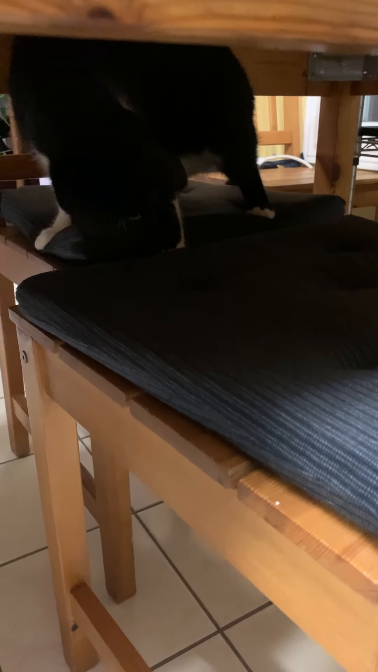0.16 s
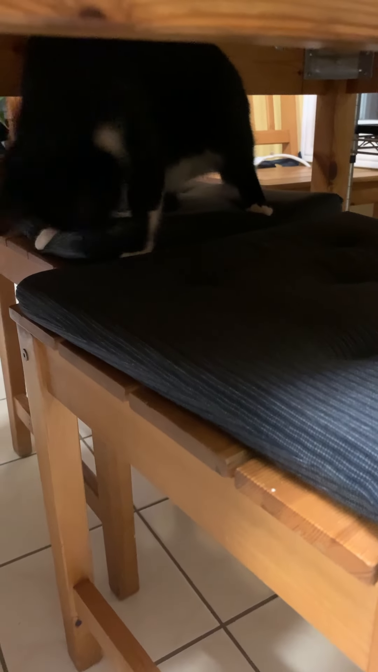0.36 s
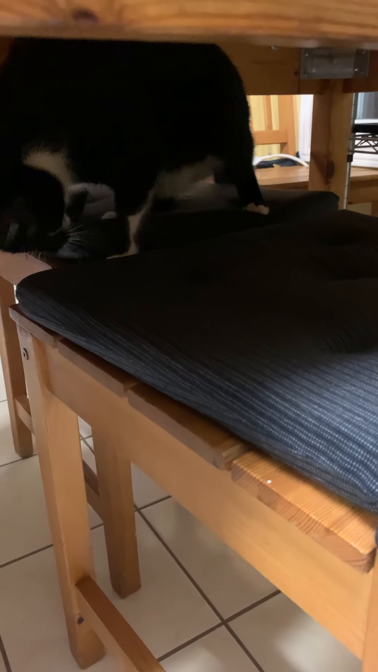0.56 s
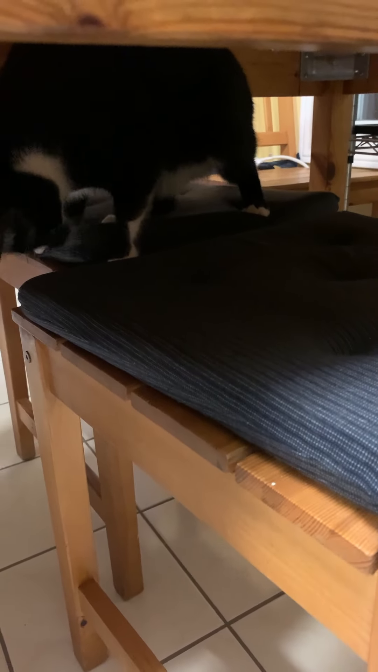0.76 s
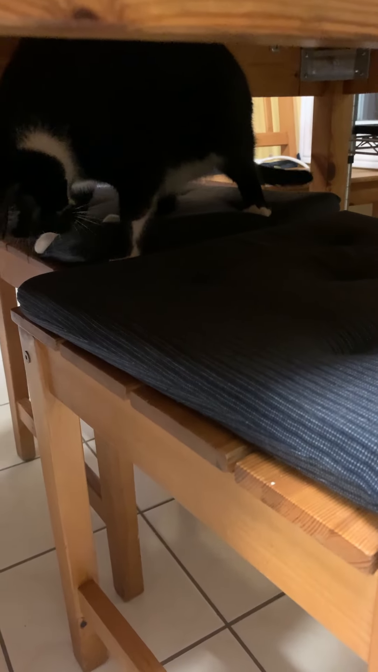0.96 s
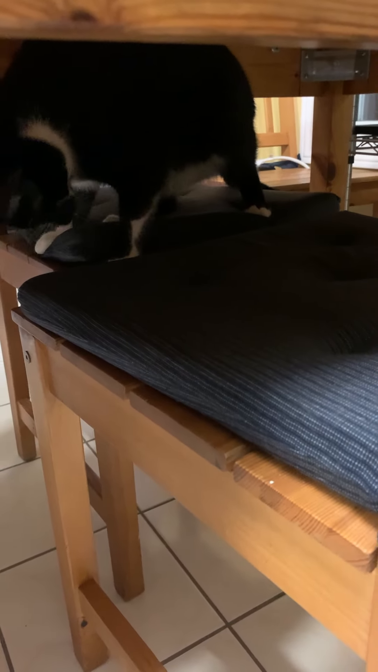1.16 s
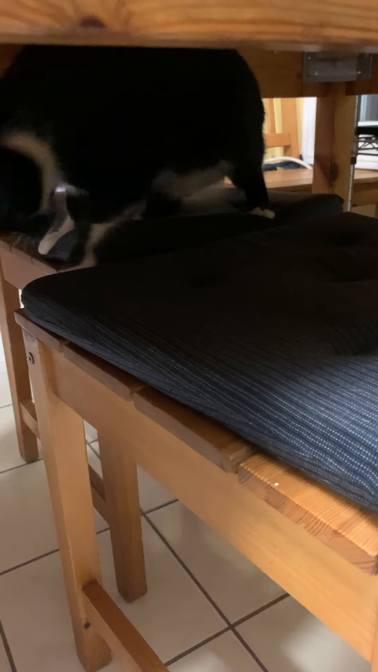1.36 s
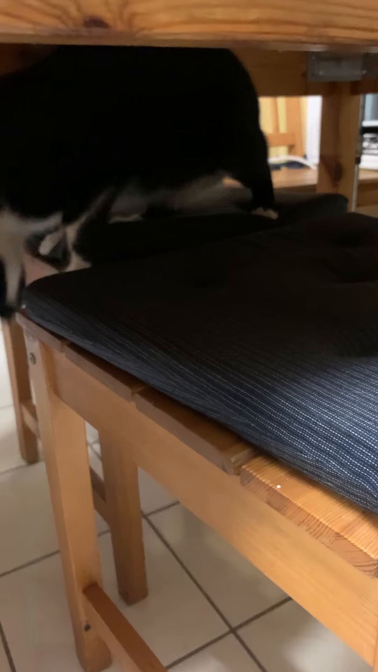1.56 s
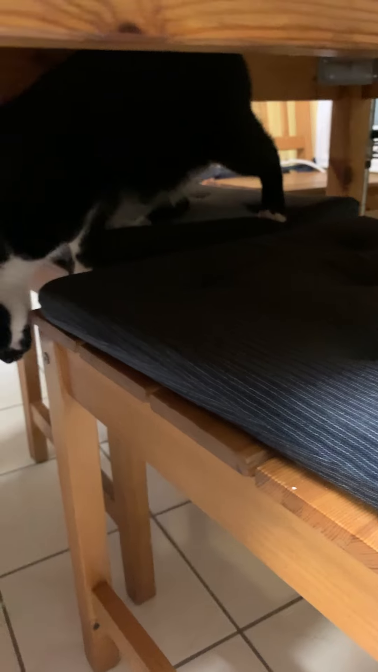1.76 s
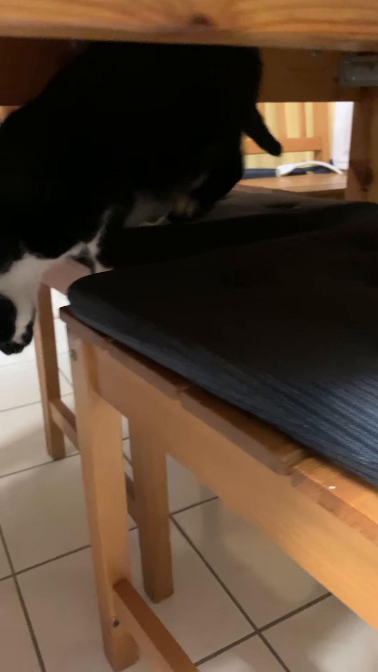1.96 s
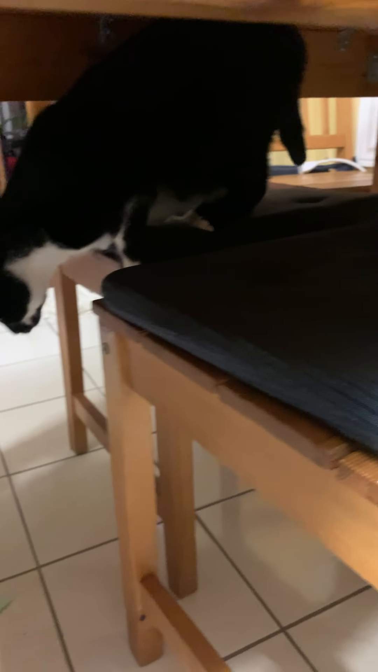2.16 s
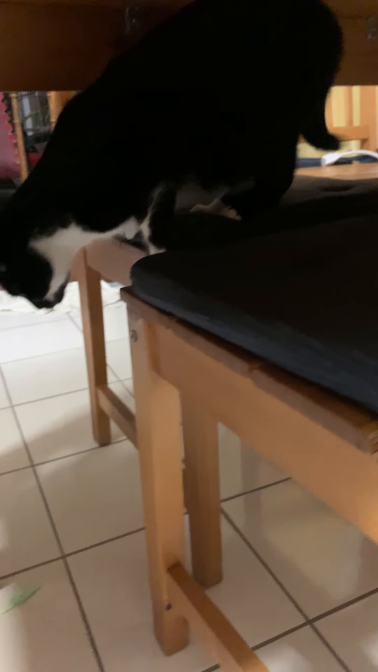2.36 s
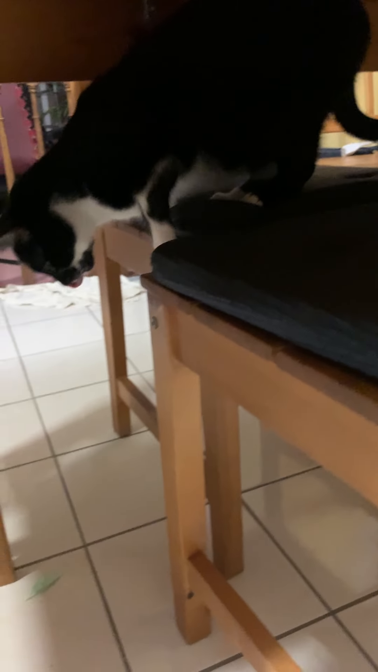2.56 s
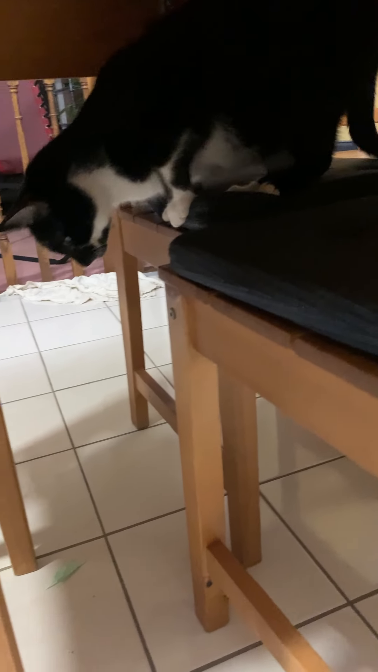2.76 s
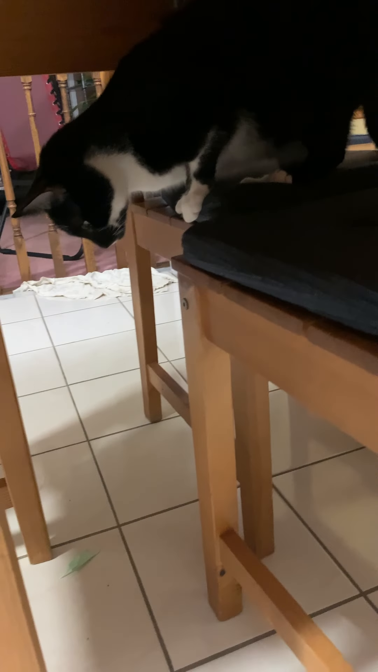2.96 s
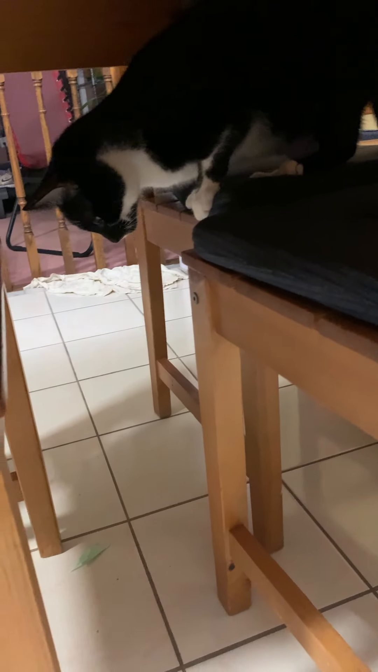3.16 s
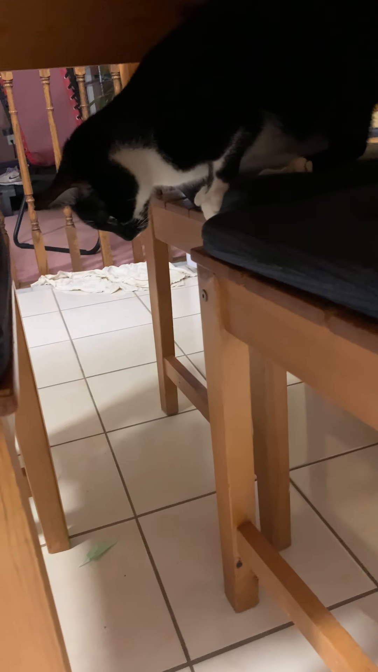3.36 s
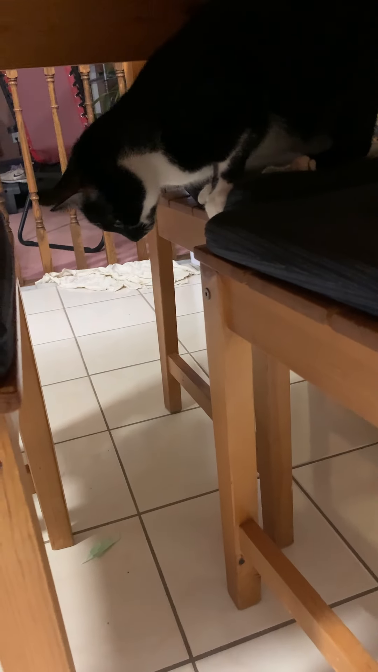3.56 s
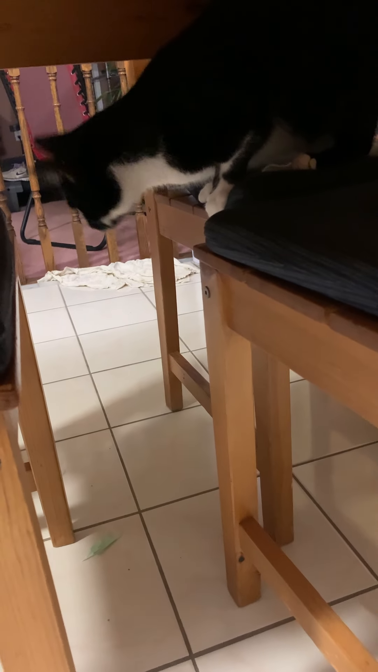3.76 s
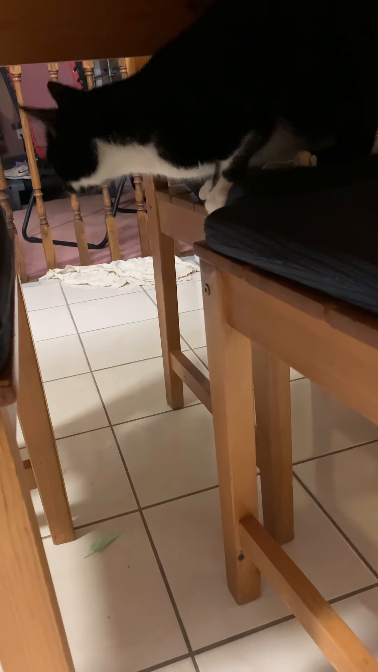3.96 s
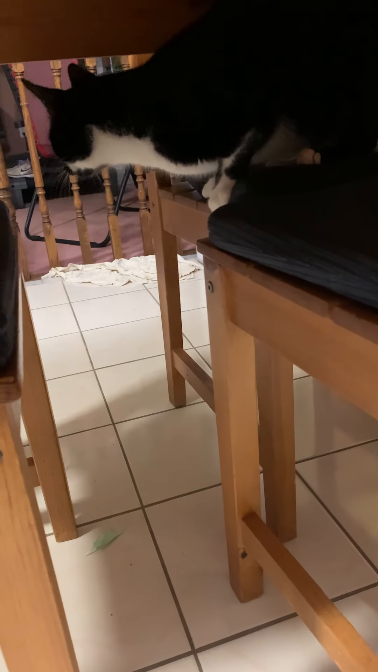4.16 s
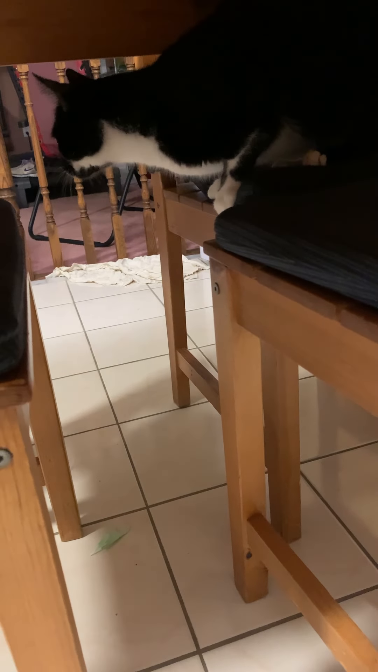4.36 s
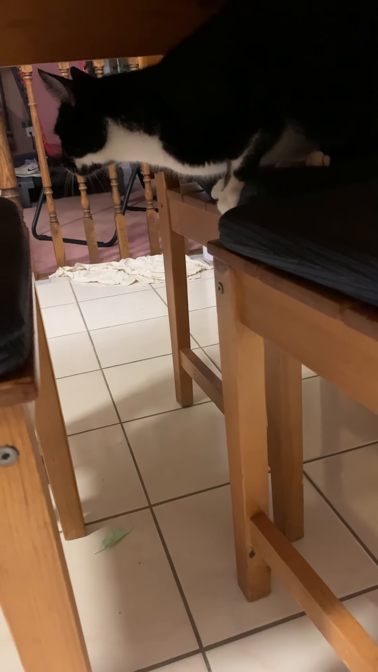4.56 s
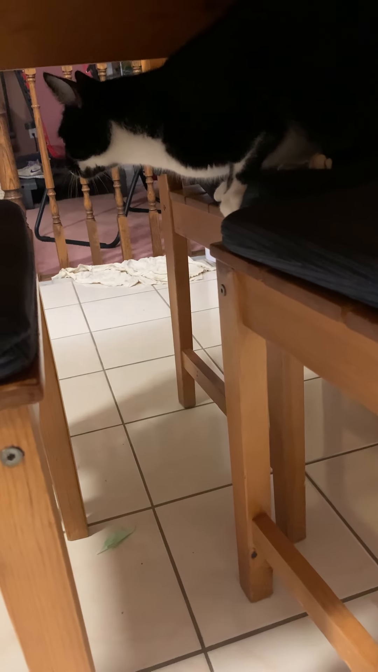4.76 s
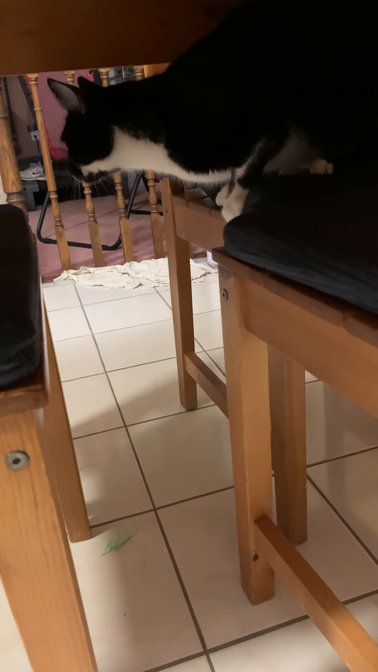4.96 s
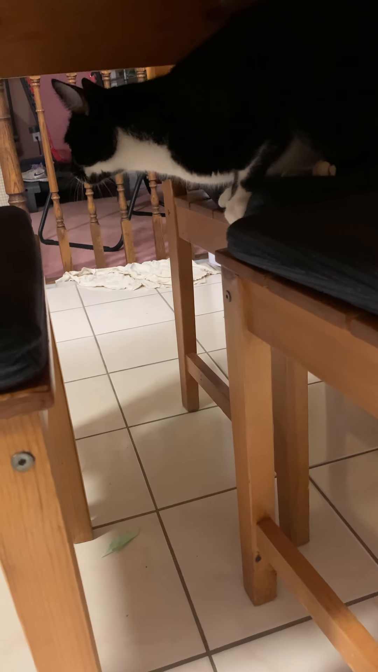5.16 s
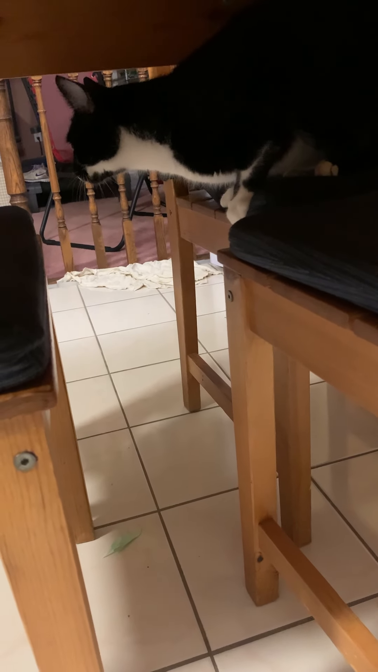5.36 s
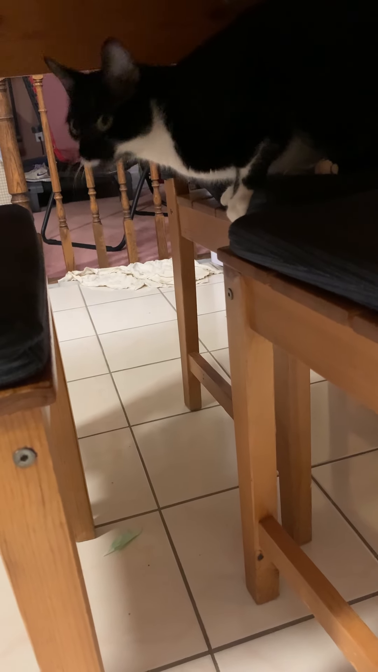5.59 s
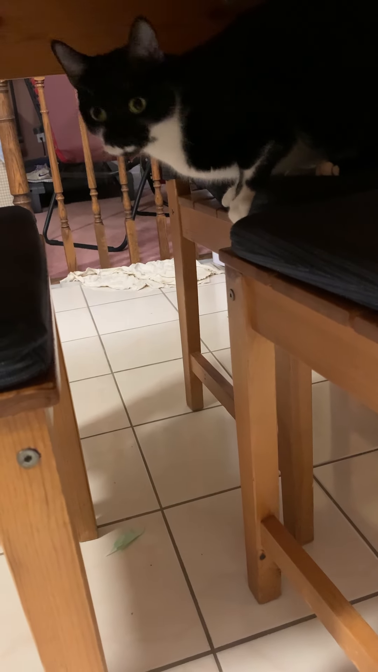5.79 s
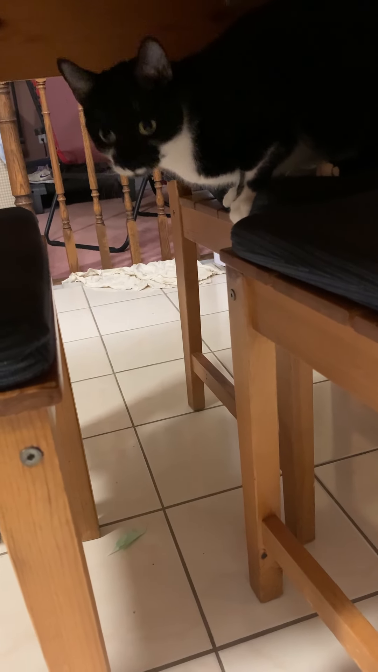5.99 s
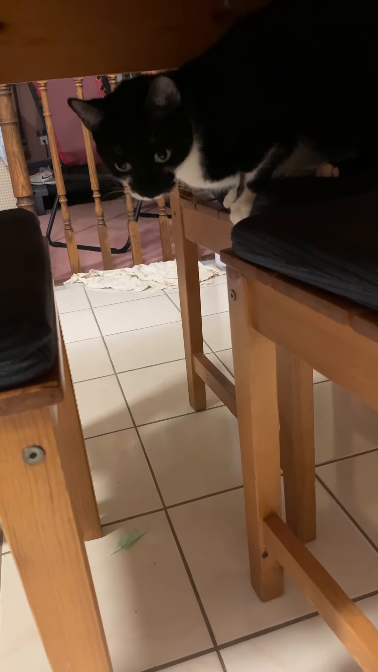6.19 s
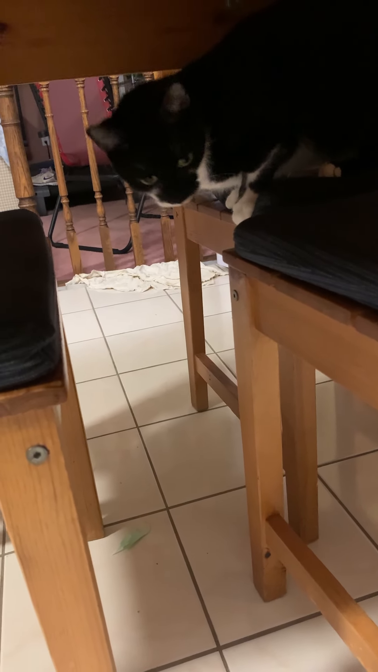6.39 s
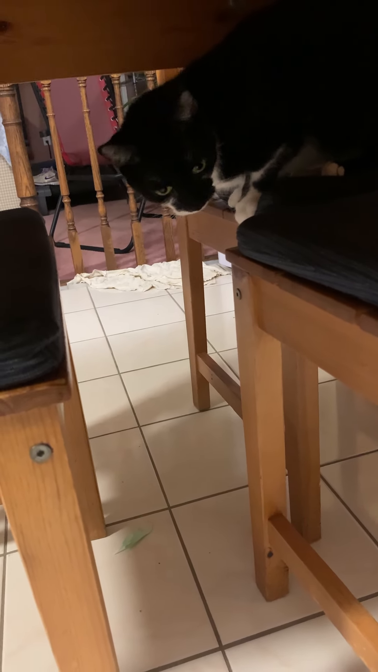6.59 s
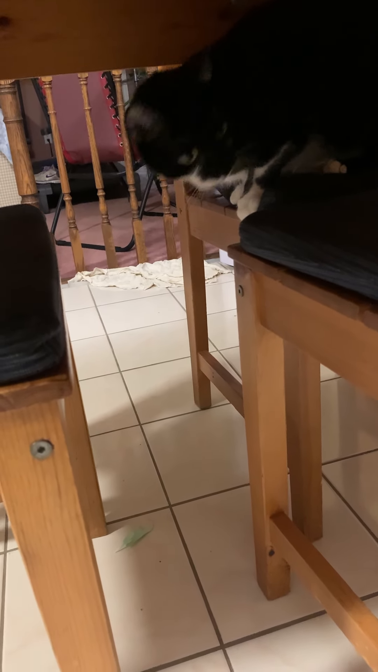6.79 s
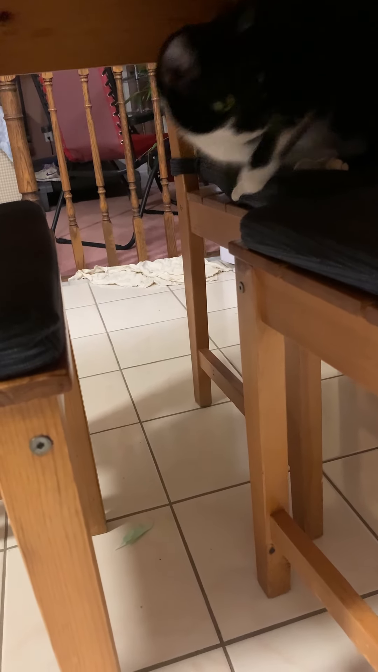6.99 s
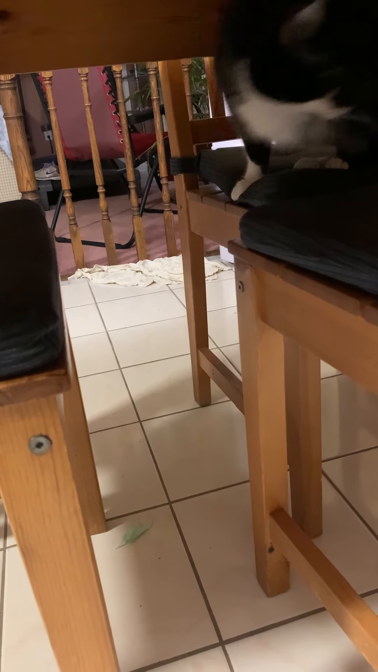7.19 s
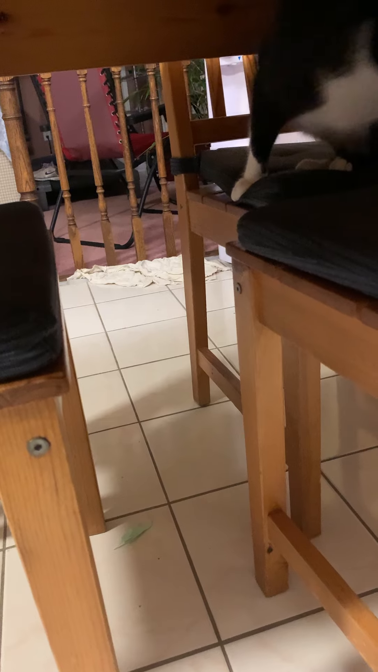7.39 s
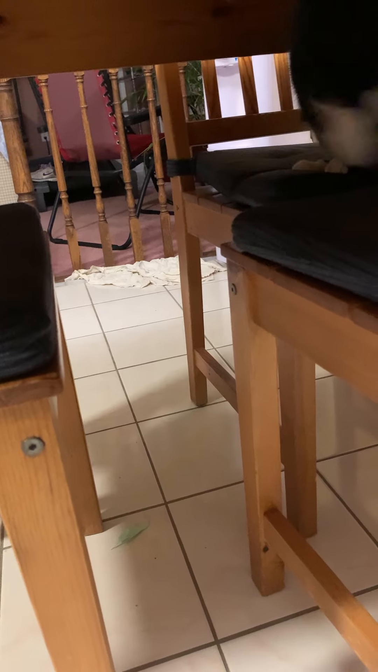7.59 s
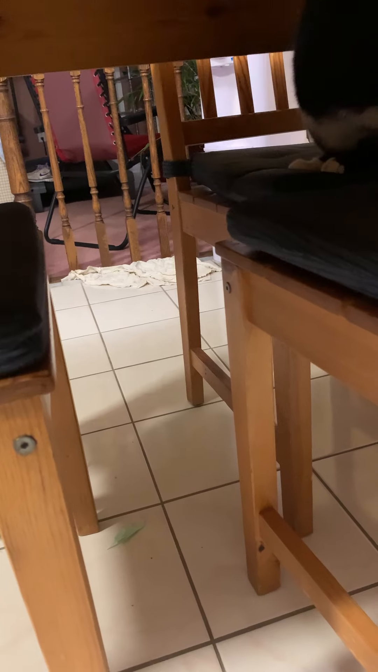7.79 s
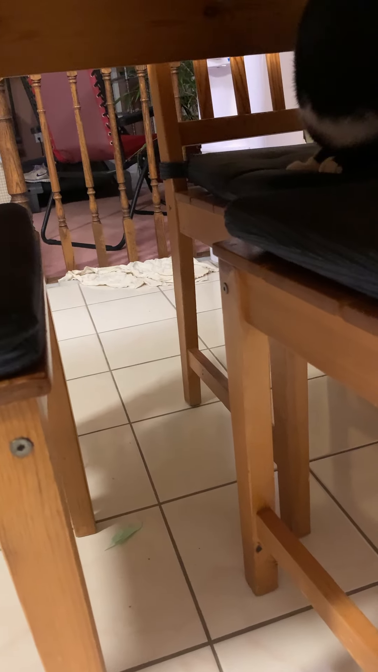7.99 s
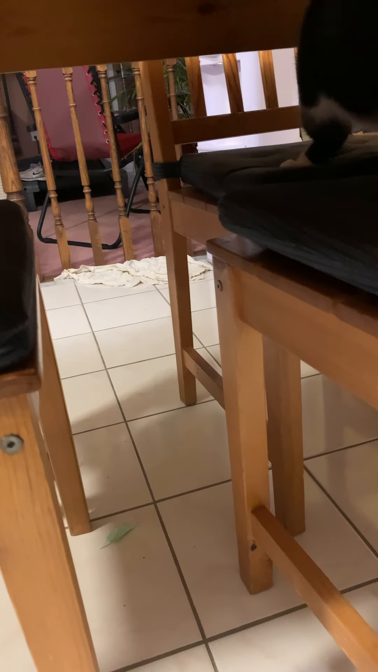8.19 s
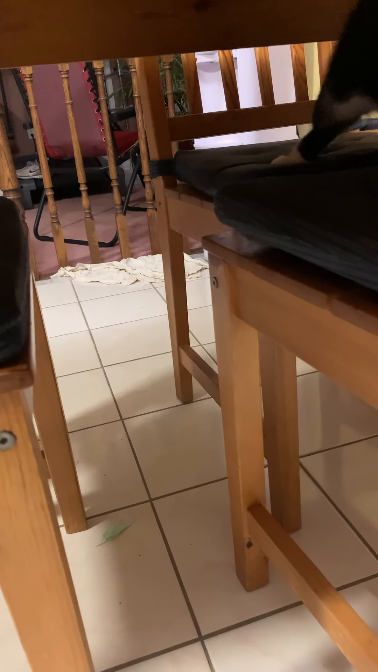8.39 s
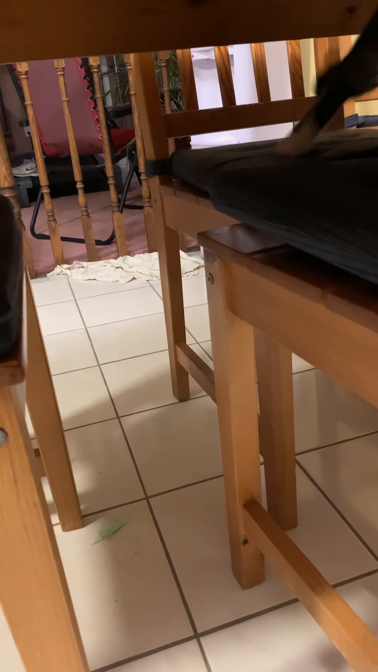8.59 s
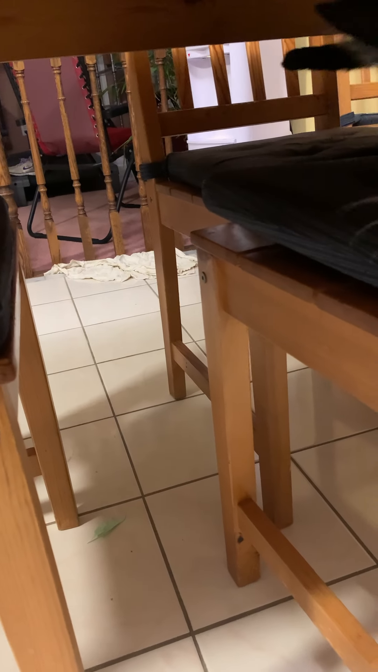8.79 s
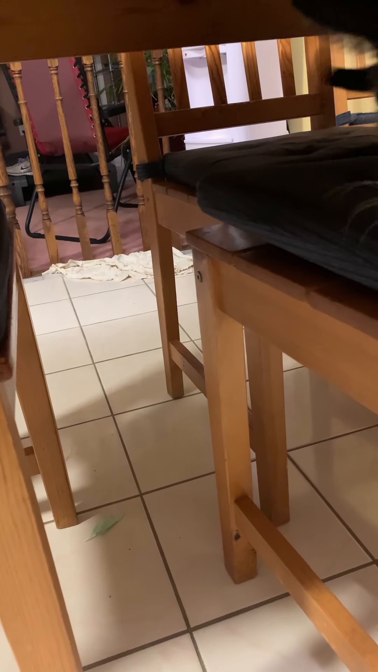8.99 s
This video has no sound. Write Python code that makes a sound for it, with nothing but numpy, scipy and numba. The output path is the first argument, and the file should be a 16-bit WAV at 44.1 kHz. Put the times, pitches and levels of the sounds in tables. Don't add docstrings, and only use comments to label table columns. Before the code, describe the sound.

A cat shifts on cushioned wooden chairs in a tiled kitchen. Hollow leg knocks, claw snags, rustling fabric and short seat squeaks fill the first moments, then a toothpick skips brightly over the tiles. About five seconds of refrigerator hum follow before the chair rocks again in uneven knocks. A close handheld phone hears it in stereo.

```python
import sys
import numpy as np
from scipy import signal
from scipy.fft import rfft, irfft, next_fast_len
from scipy.io import wavfile
from numba import njit

SR = 44100
rng = np.random.default_rng(int(sys.argv[2]) if len(sys.argv) > 2 else 0)


def ratio_of_db(decibels):
    return 10 ** (np.asarray(decibels, float) / 20)


def to_wav(s):
    ch = np.atleast_2d(s).T
    pcm = np.round(np.clip(ch, -1, 1) * 32767)
    wavfile.write(sys.argv[1], SR, pcm.astype(np.int16))


N = 398643
TIME = np.arange(N) / SR


def on_log(hz, table):
    points = np.array(table)
    return np.interp(np.log(np.maximum(hz, 1)), np.log(points[:, 0]), points[:, 1])


def tinted(x, gain):
    size = next_fast_len(x.shape[-1])
    hz = np.arange(size // 2 + 1) * SR / size
    return irfft(rfft(x, size) * gain(hz), size)[..., :x.shape[-1]]


def band(x, hz, width):
    y = tinted(x, lambda f: np.exp(-.5 * ((f - hz) / width) ** 2))
    return y / y.std()


def walk(rate, when=TIME):
    steps = rng.standard_normal(400)
    return np.interp(when * rate, np.arange(len(steps)), steps) * 1.276


def fall(t, t60):
    return np.exp(-np.log(1000) * t / t60)


def stroke(s, rise_s, t60):
    late = TIME - s
    return np.exp(np.where(late < 0, -2 * (late / rise_s) ** 2, -np.log(1000) * late / t60))


def add(out, s, sound):
    start = int(max(s, 0) * SR)
    out[:, start:start + sound.shape[1]] += sound[:, :N - start]


def bending_crack(t, blow_hz, crack_db):
    # delay/ms, level/dB
    reflections = [
        (10.6, -7.5),
        (18.5, -24.5),
        (25, -14.5),
    ]
    peak_s = .0098
    octave = np.log2(blow_hz / 200)
    late = (t - peak_s) * blow_hz
    turns = np.cumsum(.88 * blow_hz + 1900 * np.exp(-t / .0031)) / SR
    rise = (t / peak_s) ** (2.2 * (blow_hz / 200) ** 0.79)
    swell = np.where(t < peak_s, rise, np.exp(-(late / 1.3) ** 2))
    sweep = np.cos(2 * np.pi * (turns - turns[int(peak_s * SR)]))
    slap_db, slap_db_per_octave, slap_cycles = -5, 11, 0.12
    spike = (late / slap_cycles) ** 2
    slap = ratio_of_db(crack_db + slap_db + slap_db_per_octave * octave) * (1 - spike) * np.exp(-spike / 2)
    crack = ratio_of_db(crack_db - 8.5) * sweep * swell + slap
    returns = list(reflections)
    if blow_hz > 235:
        returns += [(7.0, -4), (11.0, -6)]
    crack = crack + sum(ratio_of_db(db) * np.roll(crack, int(ms * SR / 1000)) for ms, db in returns)
    return np.array([crack, 0.055 * crack])


def patter(t, tint):
    # f/Hz, level/dB, centre/ms
    packets = [(450, -19.5, 7.8), (810, -15, 6.8), (1580, -30.5, 6.5), (2480, -54, 8)]
    out = np.zeros((2, len(t)))
    for hz, db, ms in packets:
        pulse = (1000 * t / ms * np.exp(1 - 1000 * t / ms)) ** 4
        noise = band(rng.standard_normal(len(t)), hz, 0.272 * hz)
        out += ratio_of_db(db) * tint(hz) * noise * pulse * [[1], [.3]]
    return out


def frame_ring(t, tint, ring, onset):
    # f/Hz, level/dB, t60/s
    modes = [(164.5, 9, 0.11), (233.2, 0, 0.18), (273, -10.5, 0.059), (366.6, -13.5, 0.6), (420.2, 3, 0.24),
             (497, -1.5, 0.19), (556.3, 4, 0.099), (716, -6.5, 0.11), (812, -3, 0.22), (917, -6, 0.18),
             (1240, -17.5, 0.15), (1330, -28, 0.035), (1596, -11.5, 0.11), (2860, -28.5, 0.071)]
    out = np.zeros((2, len(t)))
    for hz, db, t60 in modes:
        luck = rng.standard_normal((2, 3))
        phase = 2 * np.pi * hz * (1 + 0.016 * luck[:, :1]) * t + 3 * luck[:, 1:2]
        wave = np.sin(phase) * ratio_of_db(1.87 * luck[:, 2:])
        out += ratio_of_db(db - 14.0) * tint(hz) * wave * fall(t, t60 * ring) * (1 - np.exp(-onset))
    return out


def knock_tail(t, tint, ring, onset):
    # f/Hz, level/dB, t60/s
    bands = [(127, -13.5, 0.93), (246, -0.5, 0.52), (525, -2, 0.43), (985, -7, 0.38), (1654, -25.5, 0.39),
             (2600, -30.5, 0.56), (4800, -41.5, 0.84), (6600, -42.5, 0.14)]
    early = ratio_of_db(3.0) * fall(t, 0.081)
    out = np.zeros((2, len(t)))
    for hz, db, t60 in bands:
        wave = band(rng.standard_normal((2, len(t))), hz, 0.39 * hz)
        rise = 1 - np.exp(-(t * hz / 10) ** 3 - onset)
        out += ratio_of_db(db - 19.5) * tint(hz) * wave * (fall(t, t60 * ring) + early) * rise
    return out


def knocks():
    # t/s, peak level/dB, brightness/dB, pitch of the blow f/Hz, crack over ring level/dB
    blows = [(0.014, -38, -15.5, 204, -0.5), (0.192, -22, -31, 175, 5.5), (0.356, -28.5, -37, 188, 5),
             (0.881, -47, -48, 180, 11), (0.989, -23, -25.5, 180, 4), (1.2241, -40.5, -40, 168, 8),
             (1.331, -40, -23.5, 196, 4.5), (1.6558, -20.5, -20, 245, 6.5), (1.757, -36, -48, 243, 6),
             (7.235, -42, -24.5, 154, 11), (7.3938, -23, -24, 217, 3.5), (7.553, -52, -35, 225, 6.5),
             (7.967, -53.5, -12, 176, 7.5), (8.0667, -30, -30, 325, 2), (8.072, -26, -35.5, 326, -2.5),
             (8.135, -22.5, -19.5, 286, 3.5), (8.214, -38.5, -30, 292, 8), (8.57, -44.5, -51, 237.8, 4.5),
             (8.684, -51, -39, 252, 1), (8.755, -27.5, -46.5, 267, -0.5), (8.855, -30.5, -40, 285, -1.5),
             (8.913, -53, -36, 260, 9), (8.95, -33.5, -44, 200, 2), (9.003, -54, -38, 238, 6)]
    out, t = np.zeros((2, N)), np.arange(24576) / SR
    onset = (t / 0.021) ** 3
    for s, db, bright_db, blow_hz, crack_db in blows:
        bright = bright_db + 29.5
        ring = 0.94 + 0.0195 * bright + 0.12 * np.log2(blow_hz / 200)

        def tint(hz):
            near_db = 7.5 * np.exp(-(np.log2(hz / blow_hz) / 0.78) ** 2)
            return ratio_of_db(near_db + np.interp(np.log2(hz), [9.2, 10.5], [0, bright]))
        sound = bending_crack(t, blow_hz, crack_db) + patter(t, tint)
        sound = sound + frame_ring(t, tint, ring, onset) + knock_tail(t, tint, ring, onset)
        add(out, s - .005, ratio_of_db(db) * sound * [[1], [0.65]])
    return out


def floor_boom():
    # t/s of the peak, level/dB, t60/s
    shifts = [(0.005, -56.5, 0.58), (0.205, -48, 2.08), (0.5, -57.5, 0.62), (1.011, -53, 0.36),
              (1.11, -55.5, 1.67), (1.42, -58, 0.6), (1.69, -47.5, 0.95), (7.277, -52.5, 0.76),
              (7.418, -47, 0.22), (7.512, -57, 0.31), (7.712, -59, 0.18), (7.92, -65, 0.16),
              (8.162, -43.5, 0.78), (8.552, -54, 6.5), (8.873, -49.5, 0.13), (9.03, -55, 0.34)]
    mode = band(rng.standard_normal((2, N)), 83.0, 18.4)
    return mode * sum(ratio_of_db(db) * stroke(s, 0.042, t60) for s, db, t60 in shifts)


def brittle_contacts(events):
    # delay/ms, level/dB
    near_echoes = [(1.9, -5), (3.8, 4.5), (5.5, -16), (8.0, -6), (12.2, -13)]
    snap_db, grit_db, contact_s, echo_db = 7, -5, 0.00054, -7
    out, lead = np.zeros((2, N)), .005
    t = np.arange(16384) / SR - lead
    begun = t >= 0
    snap = ratio_of_db(snap_db) * (np.arange(len(t)) == int(lead * SR))
    for s, db, low_db, top_db, room_db in events:
        noise = rng.standard_normal((2, len(t)))
        burst = snap + ratio_of_db(grit_db) * noise * np.exp(-abs(t) / (contact_s / 2)) * begun
        echoes = sum(ratio_of_db(level) * np.roll(burst, int(ms * SR / 1000), axis=1) for ms, level in near_echoes)
        tail = noise[::-1] * (ratio_of_db(-14.5) * fall(t, 0.082) + ratio_of_db(-23.5) * fall(t, 0.28)) * begun
        room = echoes * [[1], [-.6]] + tail * [[1], [ratio_of_db(3.5)]]
        sound = burst * [[1], [0.26]] + ratio_of_db(echo_db + room_db) * room
        colour = [(700, low_db - 7), (1500, low_db), (4200, low_db + 7.0), (4700, -6.5), (5200, -0.5),
                  (6800, -1.5), (8000, -4.0), (9000, -1.5), (10000, -5.0), (12000, -4.5),
                  (13500, top_db), (15500, top_db + 1.5)]
        sound = tinted(sound, lambda hz: ratio_of_db(on_log(hz, colour)))
        add(out, s - lead + 0.0012, ratio_of_db(db + 8.5) * sound)
    return out


def toothpick():
    # t/s, peak level/dB, low part level/dB, top part level/dB, room level/dB
    skips = [(1.573, -33.5, -19.5, -14, -3), (1.5989, -24.5, -17.5, 2.5, -2), (1.7355, -33.5, -7, -6, -6),
             (1.7738, -49, -1, -8, -4), (1.7944, -46.5, -11.5, -4, 1), (1.8198, -43.5, -12, 2, 0),
             (1.8374, -42, -9, -3, 0), (1.8446, -33.5, -19, -3, -1), (1.8806, -40.5, -5, -13, -4),
             (1.8927, -49.5, -7, -9, 4), (1.915, -42.5, -13, -0.5, -9), (1.9675, -46, -25, 4, -10),
             (1.981, -59, -15, -6, -9)]
    return brittle_contacts(skips)


def claws():
    # t/s, peak level/dB, low part level/dB
    catches = [(0.0135, -46.5, -26), (0.1165, -75, 4), (0.1216, -68, 3), (0.1652, -56.5, 11.5),
               (0.3022, -64, 15), (0.862, -58, -8), (1.245, -60, -5.5), (1.259, -56.5, -11.5),
               (1.271, -68, -12), (1.2943, -40, -4.5), (1.2981, -41.5, 3.5), (1.3026, -51.5, 8),
               (1.364, -64.5, 9), (1.384, -68.5, 12), (7.397, -61.5, 4), (7.408, -60.5, 10.5),
               (8.1354, -64.5, 10), (8.185, -70, 12.5), (8.6145, -62, 5)]
    top_db, room_db = -23, -0.5
    return brittle_contacts([(*catch, top_db, room_db) for catch in catches])


def rustles():
    # t/s of the peak, level/dB, rise/s, fall t60/s, pressure level/dB
    strokes = [(0.022, -54, 0.025, 0.068, 7.5), (0.126, -70.5, 0.014, 0.28, 9.5),
               (0.167, -54, 0.005, 0.1, 3), (0.205, -67, 0.022, 0.22, 2.5), (0.07, -74, 0.03, 0.16, 3.5),
               (0.26, -64, 0.024, 0.28, 6), (0.3, -63, 0.027, 0.16, -4.5), (0.335, -70, 0.014, 0.19, 2),
               (0.41, -79, 0.017, 0.32, 6), (0.372, -65.5, 0.026, 0.12, -10),
               (0.862, -66, 0.0063, 0.38, -2), (1.246, -54, 0.0083, 0.12, -3.5),
               (1.259, -51.5, 0.0027, 0.096, -4.5), (1.297, -52, 0.003, 0.045, 2),
               (1.345, -72, 0.013, 0.11, 3), (1.368, -76, 0.006, 0.077, 13),
               (1.273, -55.5, 0.0049, 0.12, -4), (1.31, -71, 0.012, 0.28, -1.5),
               (1.385, -94, 0.02, 0.15, -1), (7.406, -57.5, 0.013, 0.087, -5),
               (8.138, -64, 0.006, 0.086, 3), (8.33, -74.5, 0.035, 0.27, -12),
               (8.617, -71, 0.005, 0.12, 7.5)]
    # f/Hz, level/dB per Hz
    cloth = [(4700, -1), (5300, -2.5), (6300, 1), (7500, -8), (9000, -16.5), (12000, -29), (16000, -35)]
    bursts = rng.exponential(size=N // 64 + 1).repeat(64)[:N]
    grains = rng.standard_normal((2, N)) * ratio_of_db(2.9 * walk(39) + 0.77 * bursts)
    fine = tinted(grains, lambda hz: ratio_of_db(on_log(hz, cloth)) * (hz > 4300))
    out = fine / fine.std() * sum(ratio_of_db(db) * stroke(s, rise_s, t60) for s, db, rise_s, t60, _ in strokes)
    coarse, rub = band(grains, 1900, 1660), band(grains, 882, 190)
    for layer, layer_db, share in (coarse, -2, 1), (rub, -7.5, 2.08):
        out += layer * sum(ratio_of_db(db + layer_db + share * press_db) * stroke(s, rise_s, 1.73 * t60)
                           for s, db, rise_s, t60, press_db in strokes)
    return out


def squeaks():
    # t/s of the peak, level/dB, rise/s, fall t60/s
    presses = [
        (0.012, -57, 0.017, 0.2),
        (0.121, -55, 0.0079, 0.18),
        (0.32, -56, 0.022, 0.13),
        (0.39, -61.5, 0.017, 0.3),
        (0.845, -69.5, 0.088, 0.6),
        (0.864, -70, 0.0067, 1),
        (1.246, -56, 0.011, 0.5),
        (1.275, -52, 0.014, 0.11),
        (1.302, -57, 0.008, 0.036),
        (1.365, -67.5, 0.02, 0.14),
    ]
    squeak_hz, waver_hz, tone_db, noise_db = 1675, 22, -6, -3.5
    phase = 2 * np.pi * np.cumsum(squeak_hz + waver_hz * walk(30)) / SR
    tone = np.sqrt(2) * np.sin(phase) * ratio_of_db(1.5 * walk(38.9))
    noise = band(rng.standard_normal((2, N)), squeak_hz, 130)
    squeak = ratio_of_db(tone_db) * tone * [[1], [.4]] + ratio_of_db(noise_db) * noise
    return squeak * sum(ratio_of_db(db) * stroke(s, rise_s, t60) for s, db, rise_s, t60 in presses)


@njit
def tones(hz, gain, step):
    out = np.zeros((2, (gain.shape[2] - 1) * step))
    for k in range(len(hz)):
        z, p = 1 + 0j, np.exp(2j * np.pi * hz[k] / SR)
        for i in range(out.shape[1]):
            b, u = i // step, i % step / step
            z *= p
            for c in range(2):
                out[c, i] += (z * (gain[c, k, b] + u * (gain[c, k, b + 1] - gain[c, k, b]))).imag
    return out


def compressor():
    strong = {1: -70.5, 2: -65, 3: -52.5, 4: -65.5, 5: -71.5, 6: -68, 10: -72, 11: -59.5, 36: -84, 38:
              -80.5, 39: -79, 40: -80.5, 41: -79.5, 44: -85.5, 46: -84.5, 64: -85.5, 65: -84.5, 66: -81, 67:
              -82, 68: -82.5, 69: -68.5, 70: -77.5, 71: -78.5, 73: -87.5, 74: -80, 75: -76.5, 80: -103.5,
              82: -80.5, 105: -80.5, 106: -81.5, 107: -83, 108: -89, 126: -99}
    # f/Hz, level/dB rms
    casing = [(400, -86.5), (1200, -89.5), (2400, -99.5), (2950, -106), (3600, -99), (4500, -103),
              (5400, -87.5), (6300, -102), (6700, -110), (11000, -116)]
    # t/s, clear path level/dB, turn (-1..1)
    reach = [(0, -0.5, 0.34), (1, 1, -0.31), (1.5, -0.5, -0.0093), (2, 2.5, -0.21), (2.5, -0.5, -0.044),
             (2.9, -1.5, 0.6), (3.5, -2, 0.079), (4, 1, -0.33), (4.7, -1, 0.49), (5.5, -2, 1),
             (6, 1.5, 0.92), (6.5, -0.5, 0.51), (7, -2.5, 0.011), (7.5, 0.5, 0.5), (8, 1.4, -0.58),
             (8.5, 1.5, -0.98), (9.04, 4, -0.95)]
    # offset level/dB, share of the path, level/dB per turn
    buzz = [
        (0, 0.6, 1.3),
        (-1.3, 1.2, 0.5),
        (-2, 1.37, 7.5),
    ]
    move_db = {39: -1.5, 41: 2.5, 44: -1, 64: -6, 65: -2, 66: 10, 69: -4, 70: 3, 74: 4.5, 75: 5.5, 107: 1.5,
               108: 3.5}
    shaft_hz, move_s, move_span_s, step = 58.64, 2.62, 0.15, 512
    s, path_db, turn = np.transpose(reach)
    groups = [offset_db + share * path_db + turn_db * turn for offset_db, share, turn_db in buzz]
    blocks = np.arange(N // step + 2) * step / SR
    multiples = np.r_[1:128, 192:195]
    drift = 2 * np.pi * np.cumsum(0.0124 * walk(0.702, blocks)) * step / SR
    moved = np.tanh((blocks - move_s) / move_span_s) / 2
    gains = []
    for k in multiples:
        luck, hz = rng.standard_normal(3), k * shaft_hz
        db = strong.get(k, on_log(hz, casing) + 4 * luck[0])
        reach_db = 0 if hz < 1500 else np.interp(blocks, s, groups[int(hz > 3200) + int(hz > 5000)])
        reach_db = reach_db + move_db.get(k, 0) * moved
        unrest = min(hz / 2000, 1)
        sway_db = unrest * (2.8 * walk(1.1, blocks) + 1.5 * walk(7, blocks) + .9 * walk(40, blocks))
        sway_db = sway_db + .8 * walk(2.5, blocks)
        phase = k * drift + 1.5 * luck[1] + unrest * (.75 * walk(4, blocks) + .28 * walk(30, blocks))
        spread = np.array([[1], [np.exp(1.6j + .5j * luck[2])]])
        gains.append(ratio_of_db(db + reach_db + sway_db) * np.exp(1j * phase) * spread)
    return tones(multiples * shaft_hz, np.stack(gains, axis=1), step)[:, :N]


def fan():
    # f/Hz, level/dB rms
    hums = [(76, -68.5), (227, -64.5), (269, -81), (331, -74)]
    return sum(ratio_of_db(db) * band(rng.standard_normal((2, N)), hz, 4.3) for hz, db in hums)


def air():
    # f/Hz, level/dB per Hz
    density = [(25, -104), (45, -97), (80, -90), (200, -87), (350, -90), (600, -97.5), (1000, -103),
               (2000, -112), (3000, -118), (4200, -114), (4900, -124), (5300, -114), (5600, -117),
               (7000, -124), (10000, -127), (15600, -132)]
    flicker_db, swell_db = 2.2, .4
    noise = rng.standard_normal((2, N)) * np.sqrt(SR / 2)
    out = np.zeros((2, N))
    for low in 2 ** np.arange(4, 14.2, .5):
        half_octave = tinted(noise, lambda hz: ratio_of_db(on_log(hz, density)) * (hz >= low) * (hz < np.sqrt(2) * low))
        out += half_octave * ratio_of_db(flicker_db * min(2000 / low, 1) ** .5 * walk(14) + swell_db * walk(1.2))
    return out


def ports(field):
    # f/Hz, left lead/rad
    lead_rad = [(0, 0.43), (350, -0.5), (1000, -2.5), (1400, 0), (2000, 0.84), (3500, 1.36), (4350, 3.0),
                (5100, 4), (5600, 4.5), (7000, 7), (9000, 9.5), (13200, 15.5), (16500, 22)]
    # f/Hz, left minus right level/dB
    balance = [(60, 0), (110, 2.5), (200, 4), (380, 3.5), (700, -2), (1290, 1), (2380, -1), (4400, 3.5),
               (8120, -3.5), (15000, 2.5)]
    # f/Hz, likeness (0..1)
    likeness = [(60, 1), (180, 0.98), (350, 0.08), (600, 1), (1400, 0.33), (2800, 1), (4500, 1), (7000, 1),
                (14000, 0.97)]
    side = np.array([[1], [-1]])

    def port(hz, sign):
        share = np.sqrt((1 + sign * np.clip(on_log(hz, likeness), 0, 1)) / 2)
        shift = np.exp(.5j * side * np.interp(hz, *np.transpose(lead_rad)))
        return share * shift * ratio_of_db(side * on_log(hz, balance) / 2)
    return tinted(field[0], lambda hz: port(hz, 1)) + side * tinted(field[1], lambda hz: port(hz, -1))


def scene():
    chairs = knocks() + floor_boom()
    cat_and_toothpick = toothpick() + claws() + rustles() + squeaks()
    background = compressor() + fan() + air()
    return ports(chairs + cat_and_toothpick + background)


def top_cut(x):
    return signal.sosfilt(signal.butter(12, 17000, fs=SR, output="sos"), x)


def record(dry):
    low_pass = signal.ellip(8, .2, 50, 15900, fs=SR, output="sos")
    mix = signal.sosfilt(low_pass, dry)
    return top_cut(mix)


dry = scene()
out = record(dry)
to_wav(out)
```